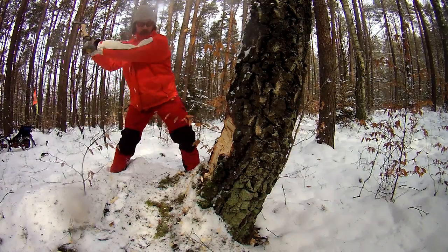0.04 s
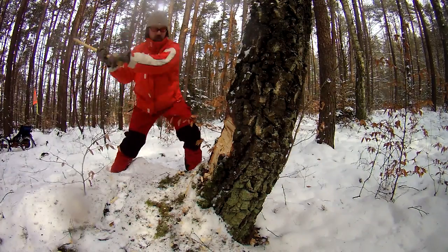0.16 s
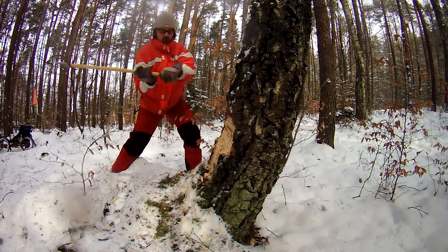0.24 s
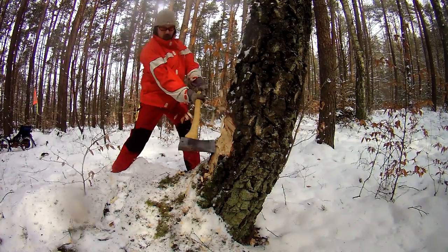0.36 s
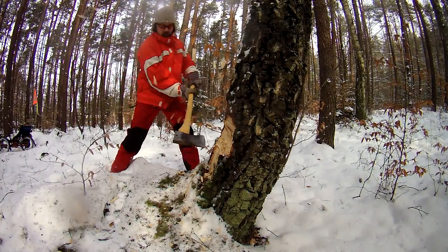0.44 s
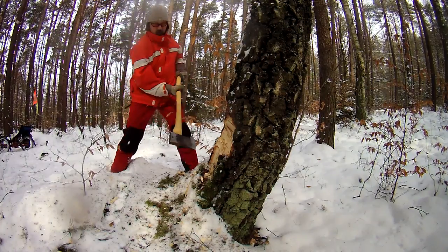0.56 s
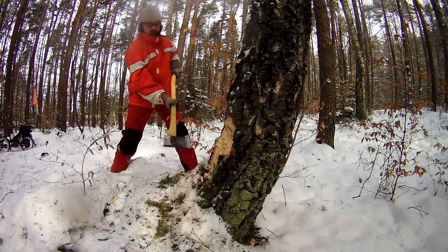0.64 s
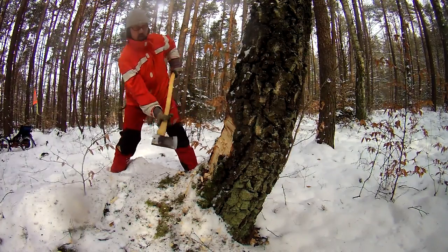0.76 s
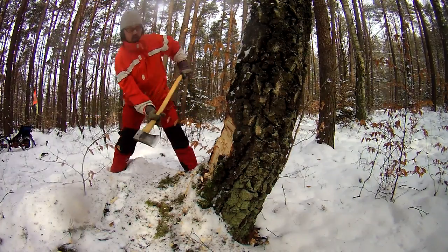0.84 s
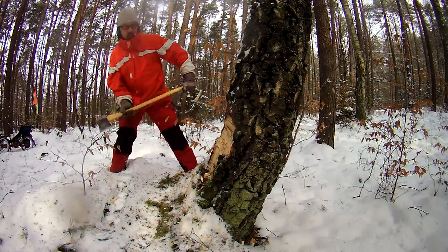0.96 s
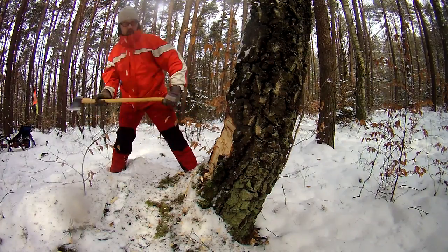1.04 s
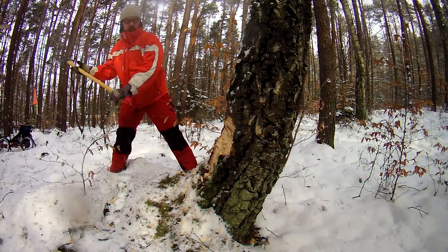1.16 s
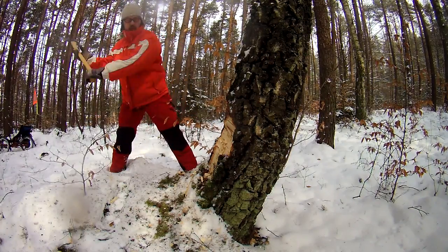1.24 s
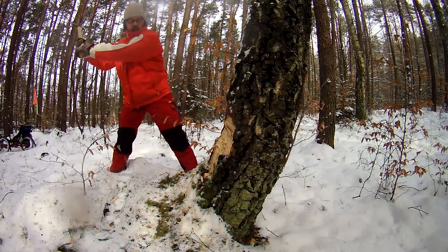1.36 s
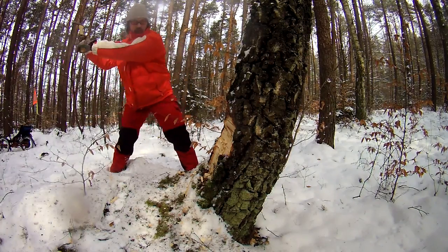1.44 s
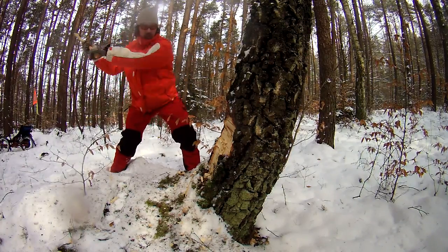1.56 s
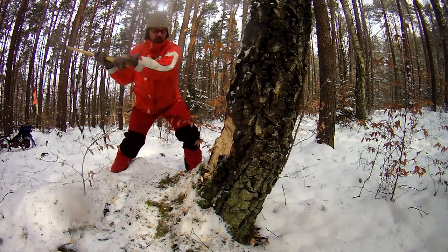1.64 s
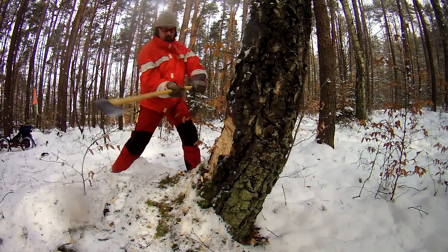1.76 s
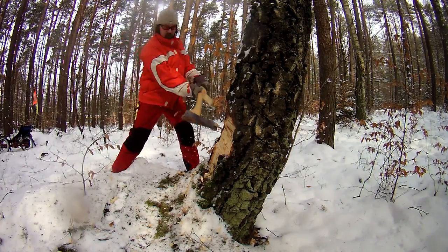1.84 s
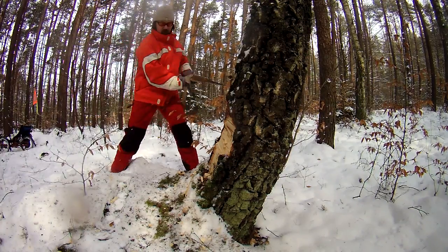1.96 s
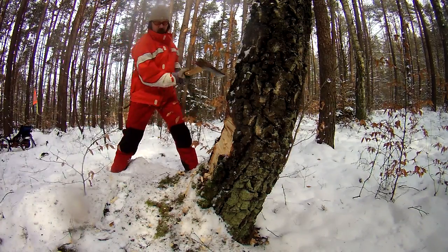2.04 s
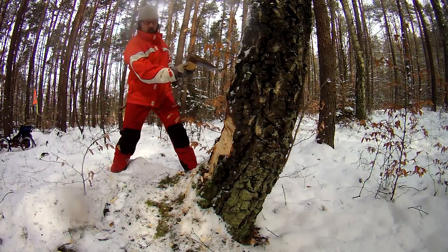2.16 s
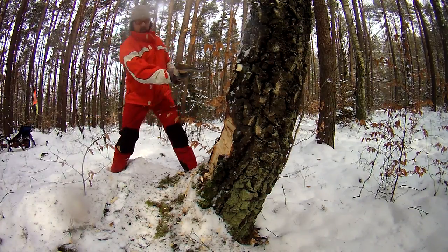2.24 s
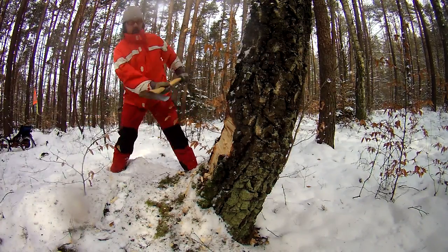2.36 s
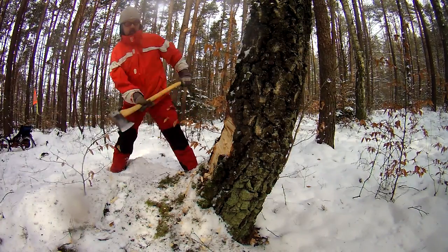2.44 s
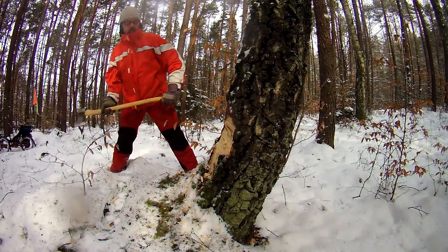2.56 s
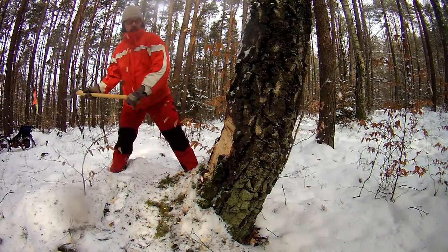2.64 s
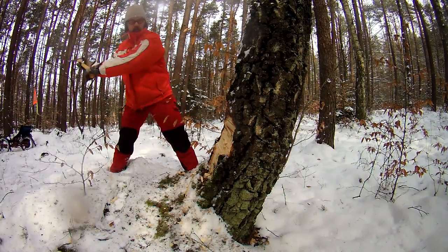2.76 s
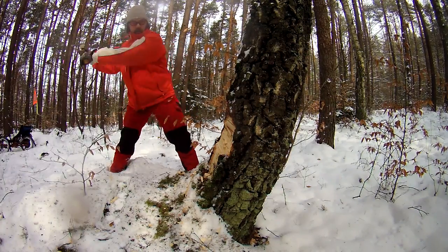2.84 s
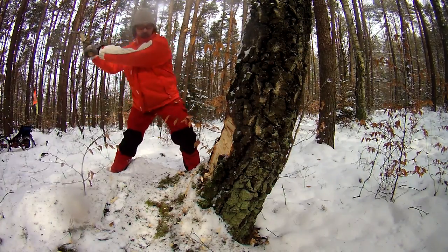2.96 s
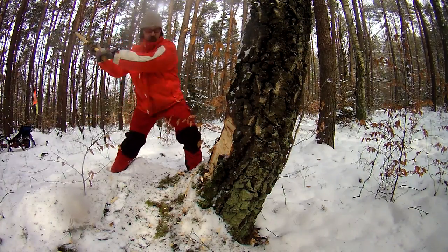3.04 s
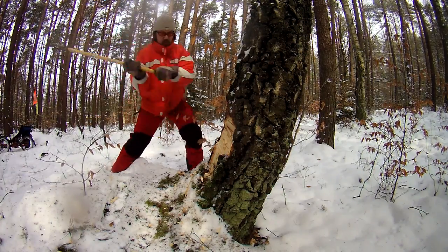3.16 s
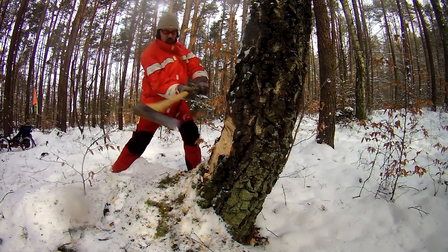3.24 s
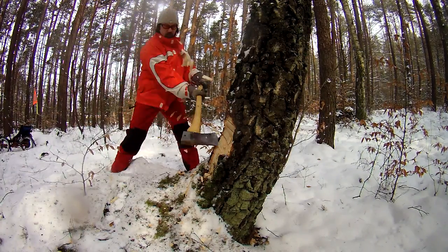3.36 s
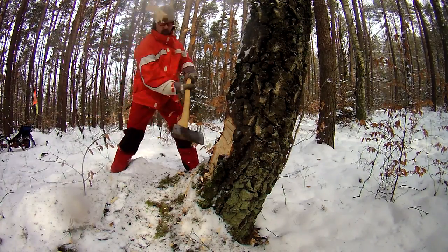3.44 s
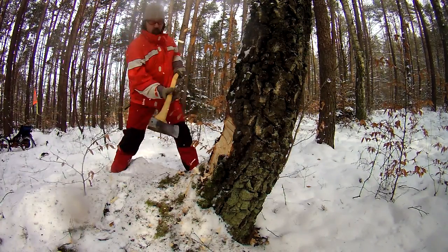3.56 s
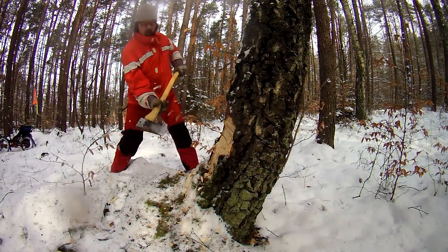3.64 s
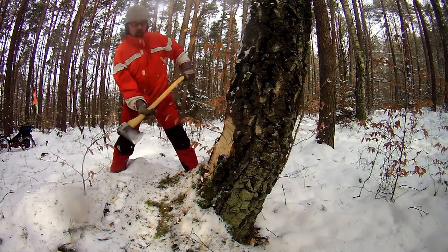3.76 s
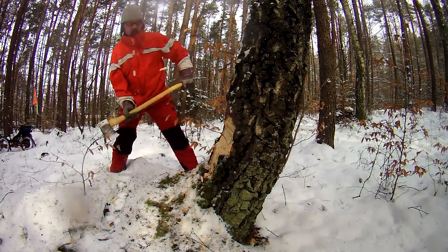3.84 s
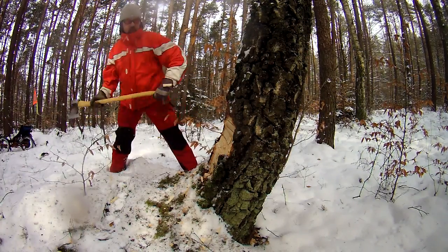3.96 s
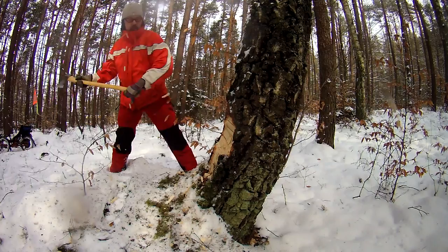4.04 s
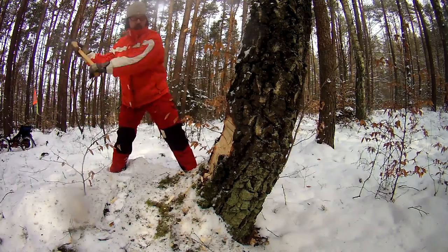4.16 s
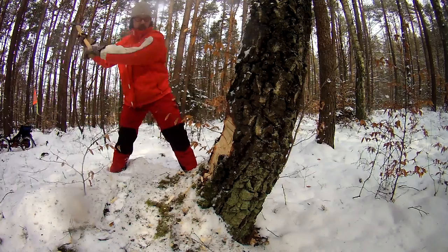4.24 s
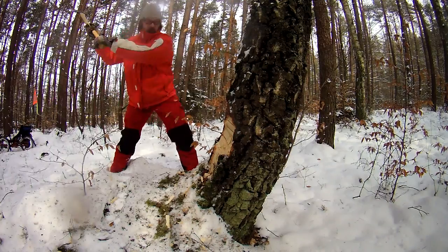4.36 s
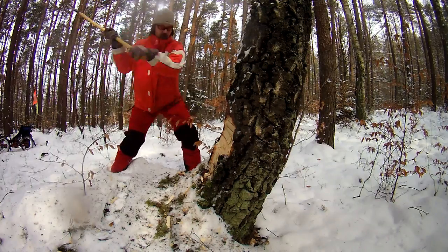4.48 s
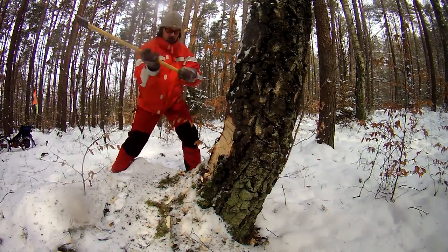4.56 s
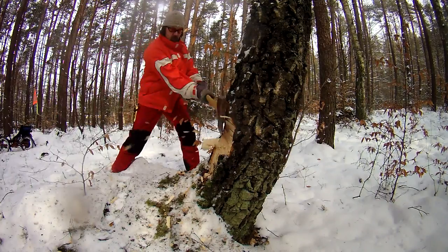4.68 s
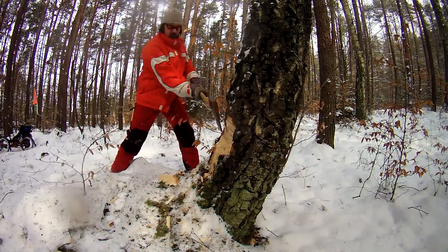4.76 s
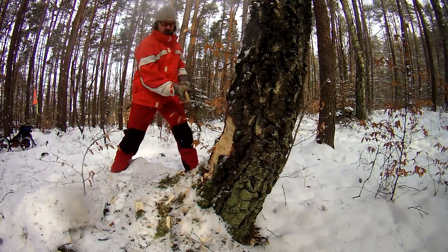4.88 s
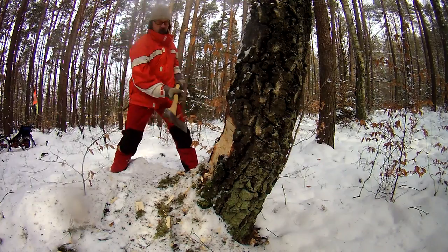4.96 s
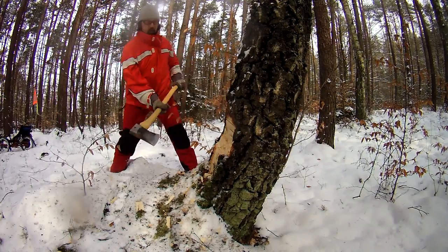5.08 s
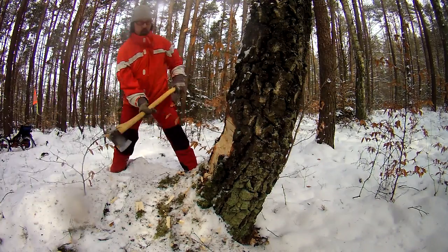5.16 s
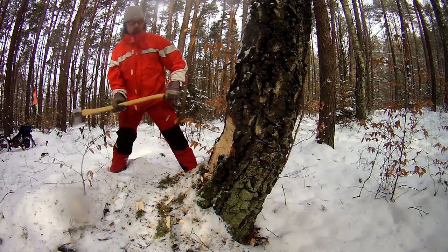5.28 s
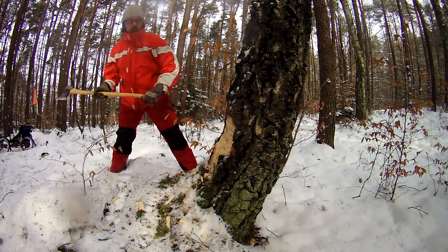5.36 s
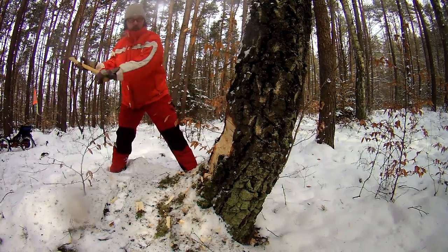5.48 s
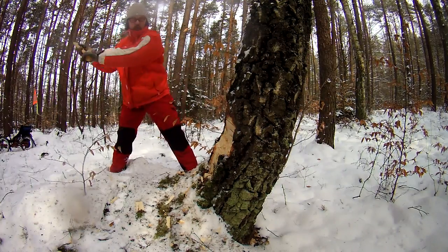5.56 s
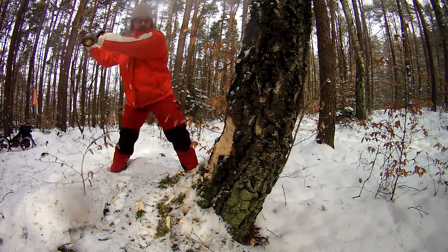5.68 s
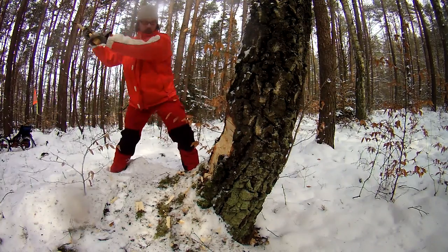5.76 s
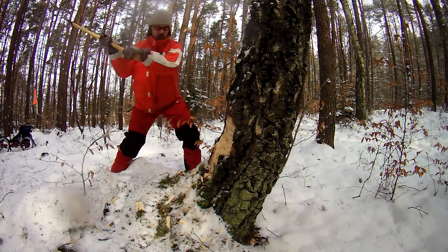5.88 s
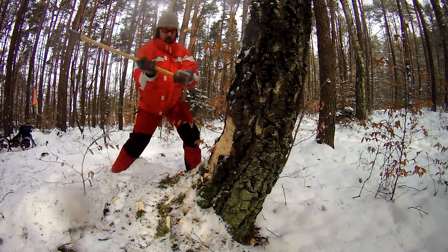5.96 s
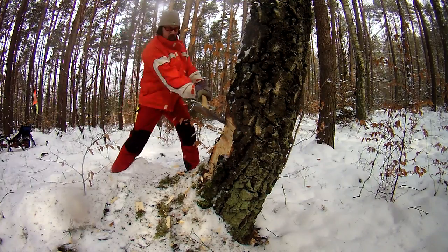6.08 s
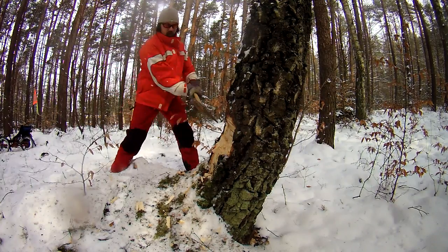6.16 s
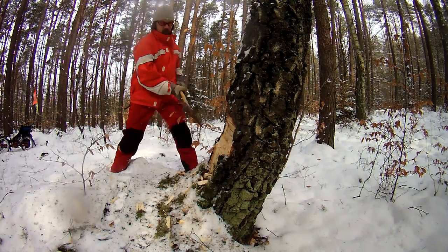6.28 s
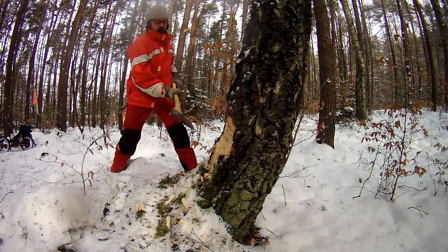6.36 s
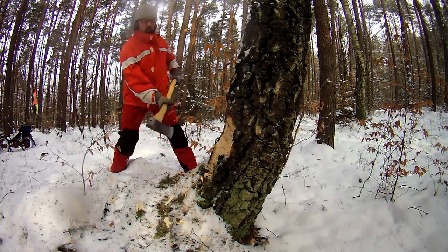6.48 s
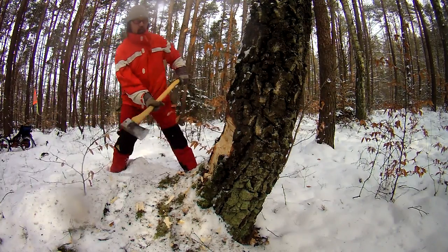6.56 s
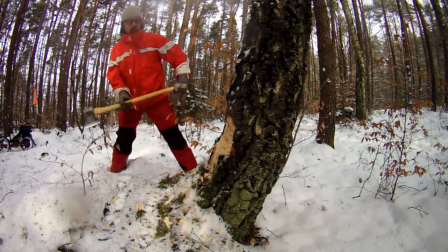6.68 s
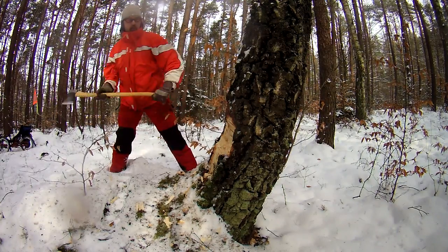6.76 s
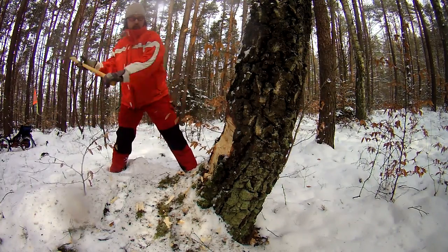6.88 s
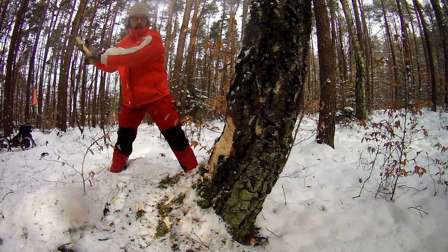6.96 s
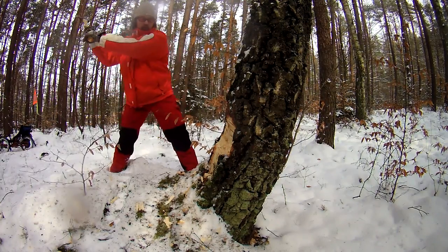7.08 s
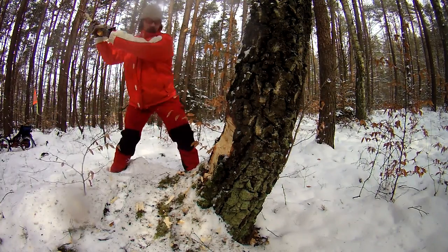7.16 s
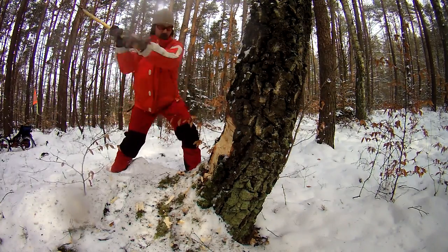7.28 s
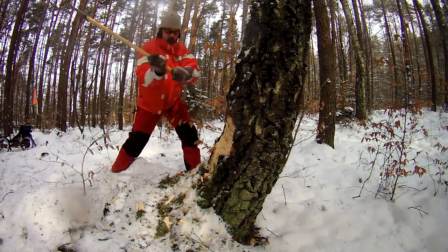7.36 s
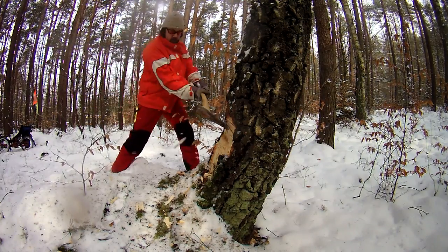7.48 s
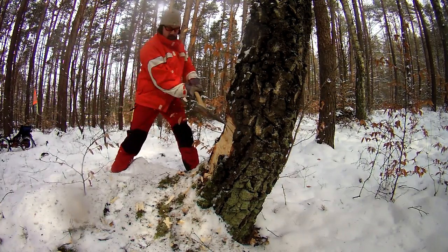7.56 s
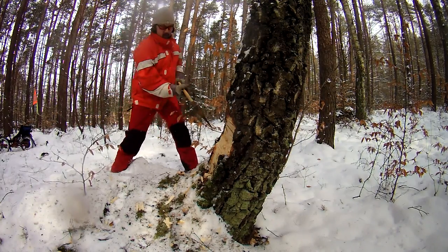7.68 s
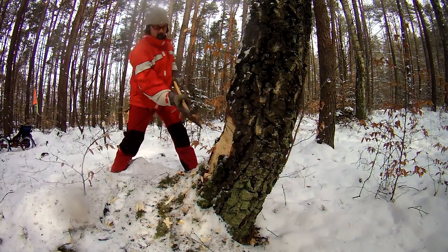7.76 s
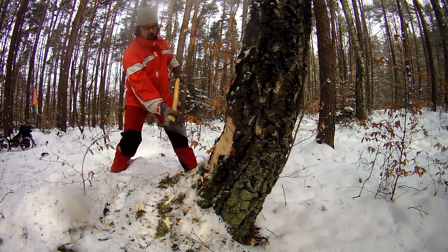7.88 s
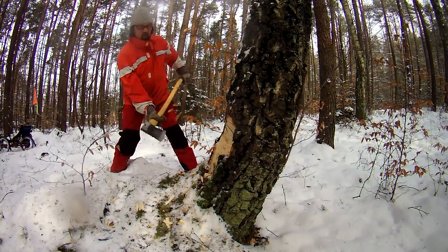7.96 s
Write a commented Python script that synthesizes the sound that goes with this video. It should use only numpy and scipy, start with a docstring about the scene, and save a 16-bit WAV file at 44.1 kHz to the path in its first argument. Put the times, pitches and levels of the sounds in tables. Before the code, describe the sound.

Six loud, evenly spaced axe blows bite into a standing tree close by, echoing briefly through a still forest as chips patter down.

```python
"""In a still, snowy wood a sleeve rubs and an axe swishes, then bites into a standing trunk close by.
Axe head and notch ring, fibres tear and the trunk thumps; the blow overloads the microphone and
scatters back from the trees. Chips patter down, boots shift and the jacket rustles between blows.
Five more blows follow; the second skids a hair and the fourth glances before it bites again.
Under it all the air stirs faintly, and a far engine hums louder, easing off near the end."""
import sys
import numpy as np
from scipy import signal
from scipy.fft import rfft, irfft
from scipy.io import wavfile
from scipy.ndimage import uniform_filter1d

SR = 44100
rng = np.random.default_rng(int(sys.argv[2]) if len(sys.argv) > 2 else 0)


def file_out(sig):
    """Save sig as 16-bit WAV at sys.argv[1]."""
    # one column per channel
    cols = np.atleast_2d(sig).T
    # limit, then scale
    lim = np.clip(cols, -1, 1)
    pcm = np.round(lim * 32767).astype(np.int16)
    wavfile.write(sys.argv[1], SR, pcm)


N = 353770

# The axe blows; the notch rings differently as it deepens. Each row: start in seconds, force in dB,
# low axe ring in dB, notch pitch in Hz and level in dB, second notch pitch in Hz and level in dB,
# haft level in dB, skid in seconds.
BLOWS = [(0.3593, 1.5, 1.5, 1920, 2.5, 2444, -0.5, -10, 0),
         (1.8263, -3.5, 9, 1049, 16, 1274, 2, -13, 0.00077), (3.2865, 1, 2, 1073, 13, 2598, 2.5, -23, 0),
         (4.6680, -5, -6, 1855, 8, 2300, 0, -12, .0085), (6.068, -2, -2.5, 1680, 8.5, 1862, 4, -23.5, 0),
         (7.4702, 3, 1.5, 1567, 6.5, 2371, 5, -22.5, 0)]


def chopping():
    """Each blow layers a bite, a thump and their echoes; a glancing blade jolts, skids and bites again."""
    tear_db, splay_db = 15, 4.5  # splay: extra tearing noise thrown sideways into the wood
    jolt_db, glance_thump_db, second_bite_db = -11.5, -3.5, -14.5
    echo_send_db = 0.76
    out = np.zeros(N)
    for at, force_db, ring_db, hz1, db1, hz2, db2, haft_db, skid in BLOWS:
        notch = [(hz1, db1), (hz2, db2)]
        tear_t60 = .02 + skid  # fibres keep tearing while the blade slides
        body = thump(1 + 0.05 * force_db, haft_db)  # the thump grows more slowly than the force
        add(out, at, undb(force_db) * bite(ring_db, notch, tear_db, tear_t60))
        if skid > 0:
            add(out, at, undb(jolt_db) * body)
            second_bite = bite(ring_db, notch, tear_db, tear_t60)
            add(out, at + skid, undb(force_db + second_bite_db) * second_bite)
            body = undb(glance_thump_db) * body
        add(out, at + skid, body)
        add(out, at + skid, forest(body))
        # every side of the trunk throws its own crack, and the first sharp instant carries furthest
        for side in range(3):
            crack = bite(ring_db, notch, tear_db + splay_db, tear_t60)
            attack = crack * fade(np.arange(len(crack)) / SR, t60=.015)
            add(out, at, undb(force_db + echo_send_db) * forest(attack))
    return out


def bite(ring_db, notch, tear_db, tear_t60):
    """The blade sinks in: axe and notch ring while fibres snap, and splinters crackle on briefly."""
    # The axe head wedged in the wood. Each row: pitch in Hz, relative level in dB, t60 in seconds.
    low_ring = [(912, 4, 0.035), (1158.2, 0, 0.033)]
    high_ring = [(1815, 8.5, 0.02), (2240, -1, 0.018), (2447, 5, 0.012), (2802, -14, 0.028)]
    # The tone of splitting fibres. Each row: frequency in Hz, gain in dB.
    tear_eq = [(150, -11), (600, -4), (1200, 3), (2600, -1), (3500, -10), (4700, -7.5), (7000, -21),
               (10000, -30.5), (15000, -41.5)]
    t = clock(.2)
    ring = sum(mode(t, hz, db + ring_db, t60) for hz, db, t60 in low_ring)
    ring += sum(mode(t, hz, db - 4, t60) for hz, db, t60 in high_ring)
    ring += sum(mode(t, hz, db, t60=.021) for hz, db in notch)
    snapping = grains(len(t), spread_db=4) * fade(t, tear_t60)
    splinters = grains(len(t), spread_db=13) * fade(t, 7 * tear_t60) * undb(-41)
    fibres = undb(tear_db) * colour(snapping + splinters, tear_eq)
    onset = 1 - np.exp(-(t / 0.0015) ** 3)  # the force builds as the wedge goes through the bark
    return (ring + fibres) * onset


def thump(thump_db, haft_db):
    """The stopping axe pushes the trunk and jars its haft; neighbouring modes move in opposite senses."""
    # Trunk, roots and frozen ground. Each row: pitch in Hz, relative level in dB, t60 in seconds.
    trunk_modes = [(56.5, -26.5, 0.46), (82.5, -24, .41), (79.2, -8.5, .141), (91, -2.5, 0.022),
                   (128, -3.5, .077), (143.7, -1.5, 0.074), (153, -4, 0.093), (188, 0, 0.043),
                   (185, -30, 0.27), (233.7, -16.5, 0.14), (258.6, -26, 0.16), (276, -20.5, 0.12)]
    t = clock(0.55)
    body = sum((-1) ** k * mode(t, hz, db + thump_db, t60) for k, (hz, db, t60) in enumerate(trunk_modes))
    body += mode(t, hz=406, db=haft_db, t60=0.06)
    body += mode(t, hz=30, db=thump_db - 30, t60=0.42)  # the ground sways under the microphone
    push = swell(clock(.01), at=.0029, length=0.00043)
    return signal.fftconvolve(body, push / push.sum())


def forest(x):
    """Single echoes from near trunks, a cluster from a stand further off, then a thinning spray."""
    # Slaps off the nearest trunks. Each row: delay in seconds, level in dB.
    near_trees = [(0.0225, -26), (.037, -38.5), (.0775, -51), (.082, -55)]
    # The tone the trees send back. Each row: frequency in Hz, gain in dB.
    scatter_eq = [(60, -4), (200, -5.5), (400, -6.5), (700, -15), (950, -3.5), (1300, -2), (1900, -4),
                  (2400, -4), (2900, -0.5), (3650, -13), (4300, -11), (5600, -21.5), (15000, -32)]
    t = clock(1.5)
    near_spray = undb(-54.5) * fade(t, t60=.33)
    far_spray = undb(-61.5) * fade(t, t60=1.4)
    stand = undb(-58) * swell(t, at=.075, length=0.0044)
    build_up = 1 - np.exp(-(t / 0.0082) ** 2)
    echoes = grains(len(t), spread_db=2.5) * (near_spray + far_spray + stand) * build_up
    for delay, db in near_trees:
        add(echoes, delay, undb([db]))
    return colour(signal.fftconvolve(x, echoes), scatter_eq)


def chips():
    """Each chip lands with a bright tick and a short knock."""
    # The louder chips and crumbs of ice.
    # Each row: start in seconds, knock peak in dB, pitch in Hz, tick level in dB.
    landings = [(.811, -44, 2870, -47), (0.915, -36.5, 2480, -40), (.993, -30.5, 2040, -40),
                (1.2145, -20.5, 2650, -33), (1.2199, -21, 2150, -33.5), (1.288, -32.5, 1320, -43),
                (1.3479, -19.5, 2564, -62), (1.370, -38, 1610, -64), (1.387, -34.5, 1580, -66),
                (1.457, -39, 1620, -64), (1.5657, -36.5, 2710, -38), (3.984, -45.5, 2620, -49.5),
                (4.422, -41, 2670, -40), (5.459, -43, 1330, -63), (7.152, -37.5, 1267, -61),
                (7.532, -34.5, 4610, -35), (7.619, -31, 1820, -44)]
    # What the chips land on. Each row: pitch in Hz, relative level in dB.
    surface_modes = [(1100, -8), (1630, -3.5), (2050, -13), (2540, -10.5)]
    # The tone of the tick. Each row: frequency in Hz, gain in dB.
    tick_eq = [(1000, -23.5), (2500, 7), (4800, 0), (7500, -8), (15000, -27)]
    knock_t60, tick_t60 = .017, .016
    knocks, ticks, t = np.zeros(N), np.zeros(N), clock(.08)
    surface = sum((-1) ** k * mode(t, hz, db, knock_t60) for k, (hz, db) in enumerate(surface_modes))
    for at, knock_db, hz, tick_db in landings + crumbs(count=6):
        knock = mode(t, hz, 0, knock_t60) + surface
        add(knocks, at, undb(knock_db) * knock / np.abs(knock).max())
        add(ticks, at, undb(tick_db) * grains(len(t), spread_db=7.7) * fade(t, tick_t60))
    return knocks + colour(ticks, tick_eq)


def crumbs(count):
    """Faint crumbs drop at random moments, as rows like those of the chips."""
    low_hz, high_hz = 1300, 3080
    rows = []
    for when, size, pitch in rng.random((count, 3)):
        knock_db = -50.5 + 2 * (2 * size - 1)
        tick_db = knock_db - 6.5
        rows.append((when * N / SR, knock_db, low_hz + pitch * (high_hz - low_hz), tick_db))
    return rows


def woodcutter():
    """Sleeves rub on the wind-up, boots press the snow, and the axe swishes just before each blow."""
    # Brisker rubs of the jacket. Each row: centre in seconds, level in dB, half-width in seconds.
    rustles = [(1.594, -53.5, .036), (3.892, -63, .04), (4.359, -62.5, .088), (5.969, -64.5, 0.031)]
    # The tone of the cloth. Each row: frequency in Hz, relative level in dB.
    cloth_eq = [(500, -17), (1400, 14), (2700, 10), (3500, -5.5), (4500, 0.5), (8000, -15.5), (15000, -39)]
    # Boots shifting in the snow. Each row: centre in seconds, level in dB.
    steps = [(.92, -40), (1.282, -36), (2.389, -42.5), (5.917, -39)]
    # The tone of the swish. Each row: frequency in Hz, relative level in dB.
    swish_eq = [(500, -21.0), (950, -3.5), (1400, -5.5), (3000, -24.5), (8000, -41.5)]
    step_hz, step_s = 36.7, .044
    t = np.arange(N) / SR
    rubbing = undb(-67.5) * before_blows(t, lead=.31, length=0.11)
    rubbing += sum(undb(db) * swell(t, at, length) for at, db, length in rustles)
    flutter = undb(3.4 * walk(rate_hz=60))
    jacket = rubbing * flutter * unit(colour(grains(N, spread_db=8), cloth_eq))
    boots = sum(undb(db) * swell(t, at, step_s) * np.sin(2 * np.pi * step_hz * (t - at))
                for at, db in steps)
    swing = undb(-59) * before_blows(t, lead=.1, length=.035)
    swish = swing * unit(colour(rng.standard_normal(N), swish_eq))
    return jacket + boots + swish


def engine():
    """A far engine hums on one low tone that wavers in pitch and level."""
    # The hum's slow rise and fall. Each row: time in seconds, level in dB.
    level_curve = [(0, -64.5), (2.4, -60), (4.4, -55), (5.2, -51.5), (6.6, -49.5), (8, -56.5)]
    hum_hz = 109
    pitch = hum_hz * (1 + 0.0067 * walk(rate_hz=6.9))
    phase = 2 * np.pi * np.cumsum(pitch) / SR
    level_db = np.interp(np.arange(N) / SR, *np.transpose(level_curve)) + walk(rate_hz=5)
    return np.sqrt(2) * np.sin(phase) * undb(level_db)


def air():
    """Faintly stirring air: a dark, nearly steady bed of noise."""
    # The tone of the air. Each row: frequency in Hz, relative level in dB.
    air_eq = [(8, -14), (22, 2), (45, -3.5), (100, -6.5), (200, -12), (300, -15.5), (650, -26), (1000, -28),
              (1400, -29.5), (2150, -33.5), (2680, -33.5), (3350, -42.5), (4600, -42), (6500, -46),
              (15000, -47.5)]
    bed = unit(colour(rng.standard_normal(N), air_eq))
    return bed * undb(-47.5 + 0.22 * walk(rate_hz=3.1))


def before_blows(t, lead, length):
    """A bump that peaks lead seconds ahead of every blow."""
    return sum(swell(t, at - lead, length) for at, *_ in BLOWS)


def undb(db):
    """Decibels to gain."""
    return 10 ** (np.asarray(db) / 20)


def clock(seconds):
    """Sample times from zero."""
    return np.arange(int(seconds * SR)) / SR


def fade(t, t60):
    """Exponential decay, 60 dB down after t60 seconds."""
    return np.exp(-np.log(1000) * t / t60)


def swell(t, at, length):
    """A smooth bump centred on at, down to 1/e at length seconds either side."""
    return np.exp(-((t - at) / length) ** 2)


def unit(x):
    """Scale to rms 1."""
    return x / np.sqrt(np.mean(x ** 2))


def add(out, at, x):
    """Mix x into out, starting at a time in seconds."""
    i = int(at * SR)
    out[i:i + len(x)] += x[:len(out) - i]


def mode(t, hz, db, t60):
    """One struck resonance."""
    return undb(db) * np.sin(2 * np.pi * hz * t) * fade(t, t60)


def colour(x, spectrum, size=4096):
    """Causal EQ through (Hz, dB) points, built from the cepstrum."""
    hz, db = np.transpose(spectrum)
    bin_hz = np.maximum(np.arange(size // 2 + 1) * SR / size, 1)
    gain = undb(np.interp(np.log(bin_hz), np.log(hz), db))
    cepstrum = irfft(np.log(gain))
    cepstrum[1:size // 2] *= 2  # fold to minimum phase, so nothing rings ahead of an attack
    cepstrum[size // 2 + 1:] = 0
    impulse = irfft(np.exp(rfft(cepstrum)))
    return signal.fftconvolve(x, impulse)[:len(x)]


def grains(count, spread_db):
    """Dense clicks of very unequal size, rms 1."""
    return unit(rng.standard_normal(count) * undb(spread_db * rng.standard_normal(count)))


def walk(rate_hz):
    """Smooth random drift, rms 1."""
    hold = int(SR / rate_hz)
    stairs = np.repeat(rng.standard_normal(N // hold + 1), hold)
    return unit(uniform_filter1d(uniform_filter1d(stairs, hold), hold)[:N])


def scene():
    """Everything that reaches the microphone, in mono."""
    return (chopping() + chips() + woodcutter() + air() + engine())[None]


def record(dry):
    """The blows clip flat at full scale, then a steep low-pass cuts the top."""
    top_hz = 15800
    lowpass = signal.ellip(8, .2, 80, top_hz, fs=SR, output="sos")
    return signal.sosfilt(lowpass, np.clip(dry, -1, 1))


dry = scene()
out = record(dry)
file_out(out)
```